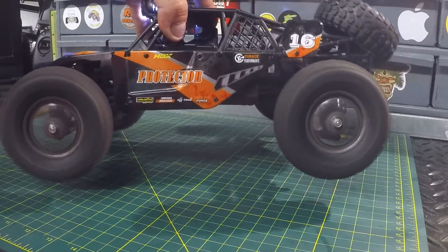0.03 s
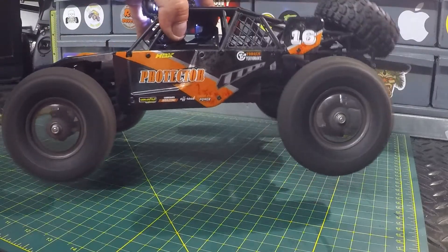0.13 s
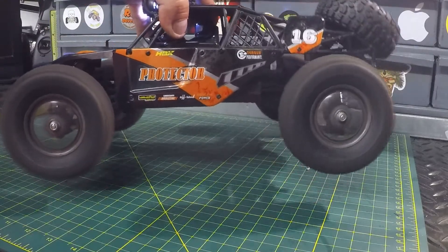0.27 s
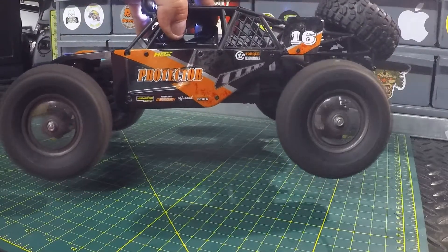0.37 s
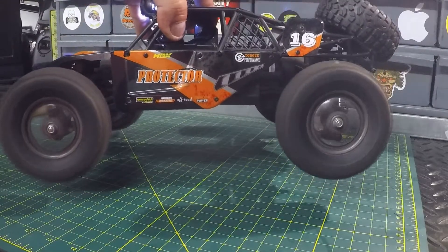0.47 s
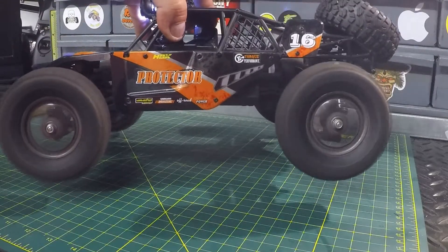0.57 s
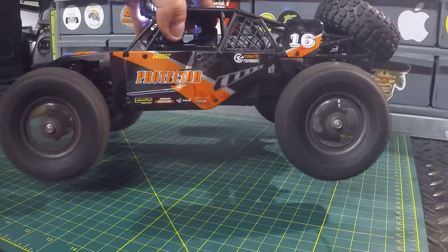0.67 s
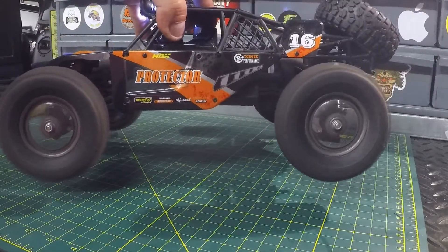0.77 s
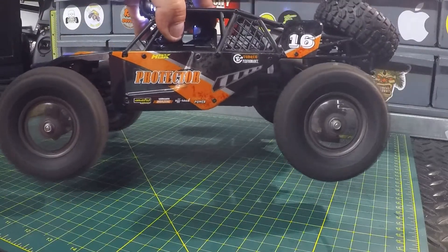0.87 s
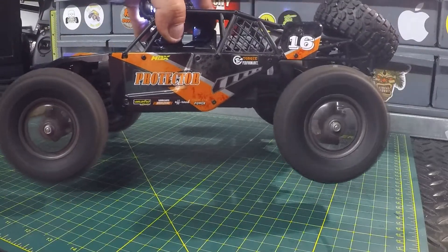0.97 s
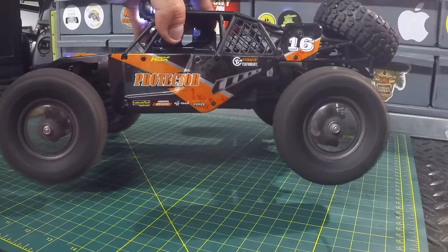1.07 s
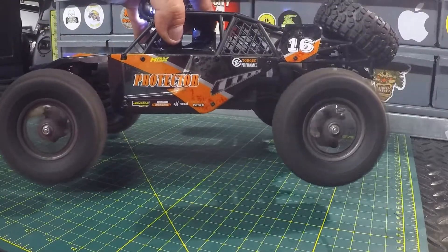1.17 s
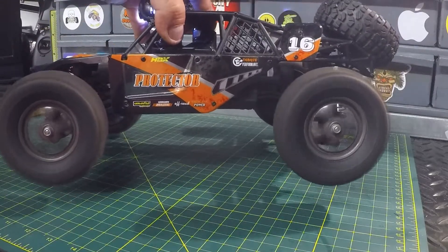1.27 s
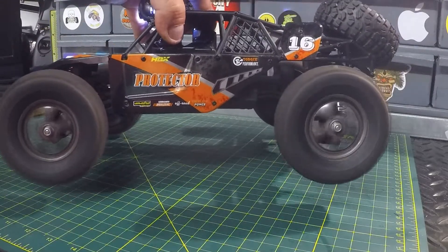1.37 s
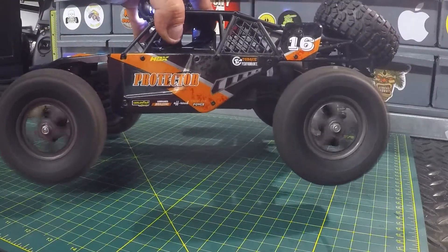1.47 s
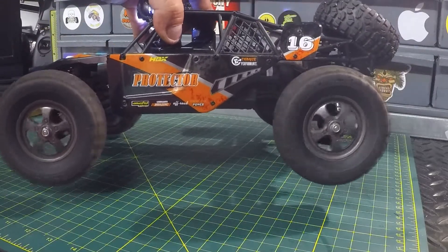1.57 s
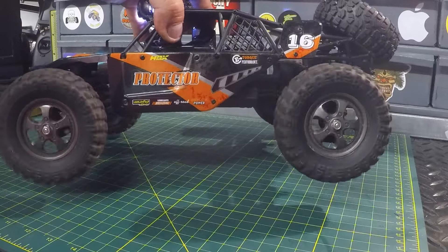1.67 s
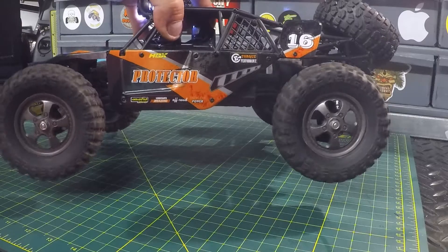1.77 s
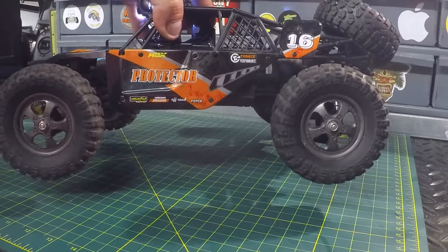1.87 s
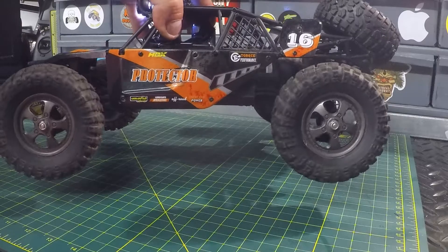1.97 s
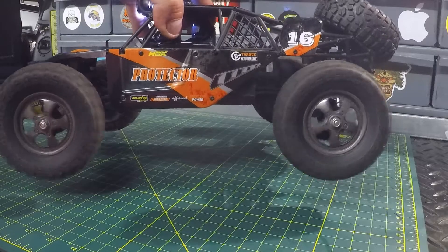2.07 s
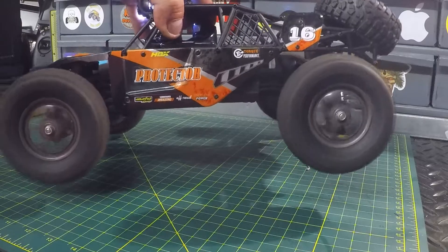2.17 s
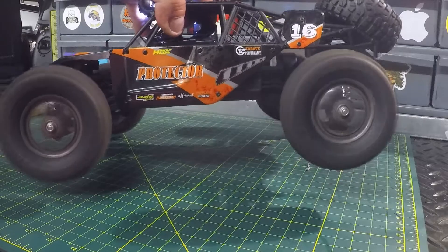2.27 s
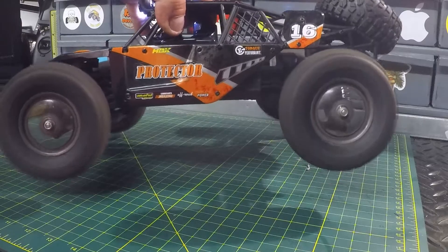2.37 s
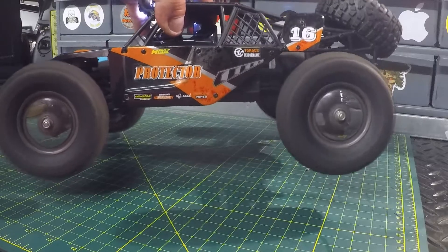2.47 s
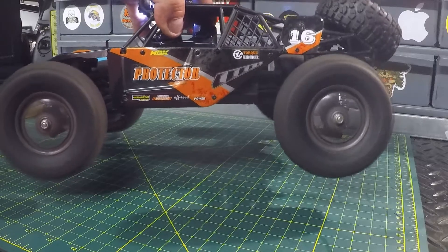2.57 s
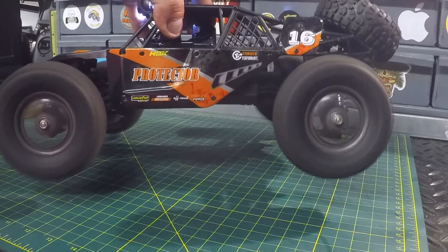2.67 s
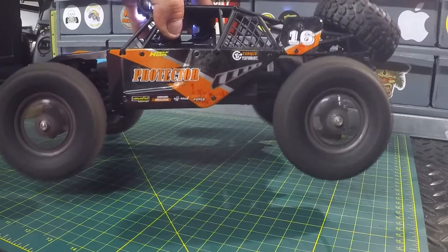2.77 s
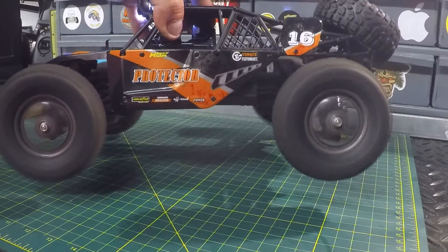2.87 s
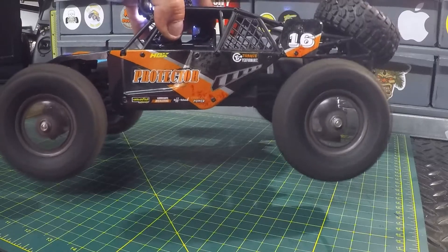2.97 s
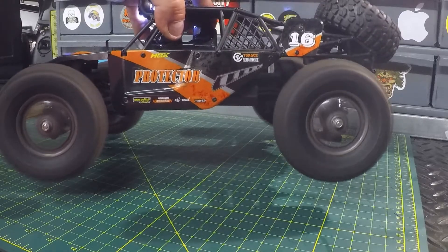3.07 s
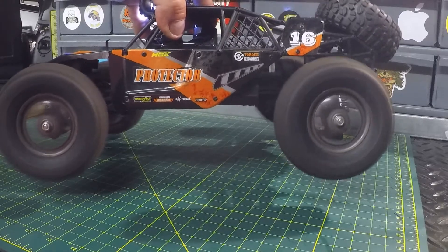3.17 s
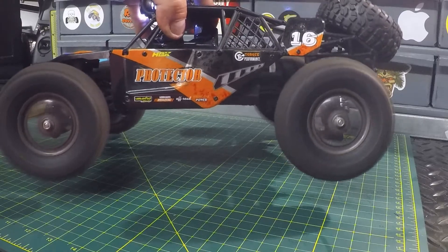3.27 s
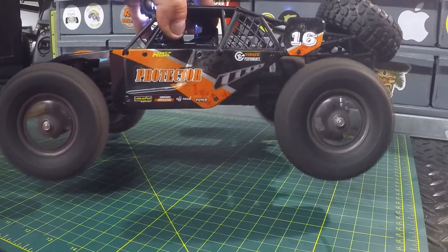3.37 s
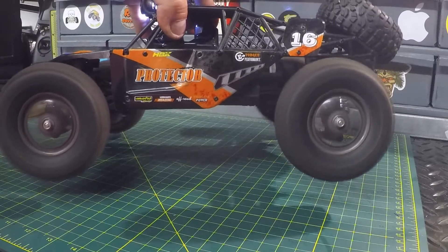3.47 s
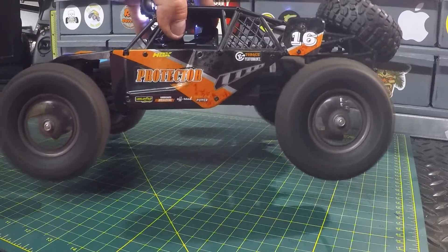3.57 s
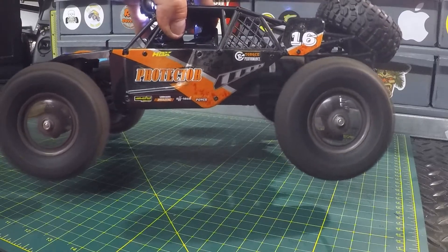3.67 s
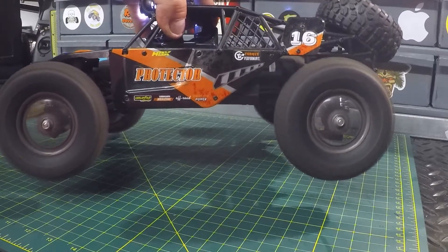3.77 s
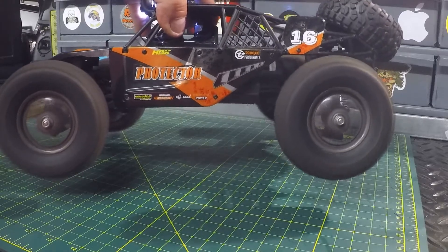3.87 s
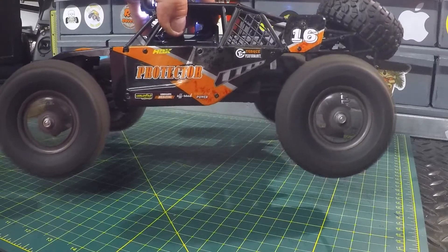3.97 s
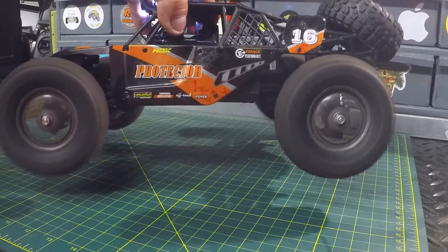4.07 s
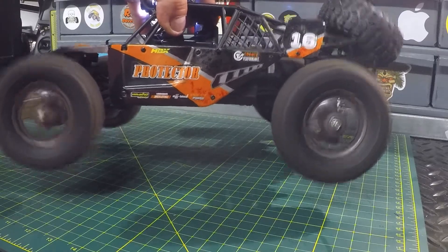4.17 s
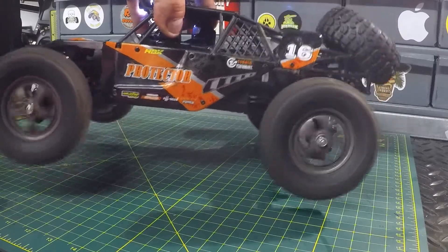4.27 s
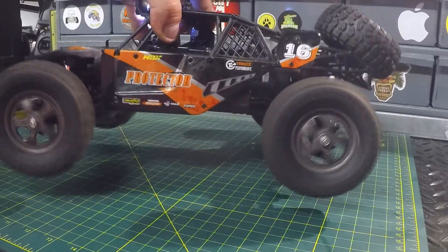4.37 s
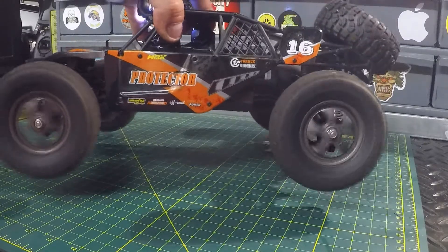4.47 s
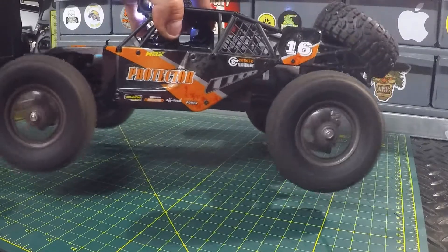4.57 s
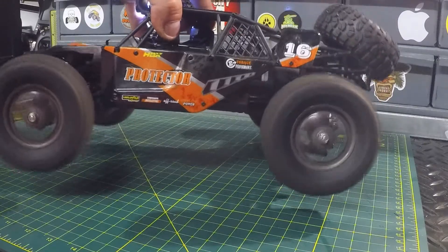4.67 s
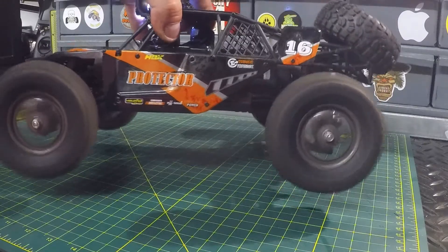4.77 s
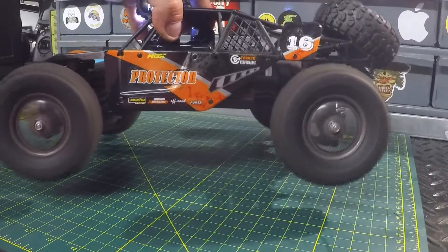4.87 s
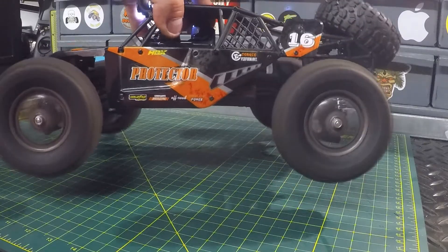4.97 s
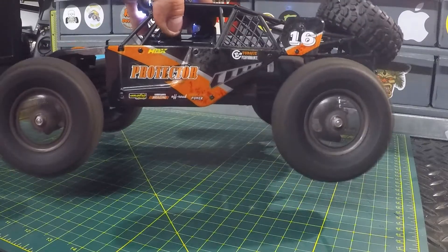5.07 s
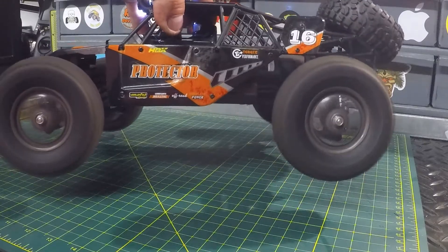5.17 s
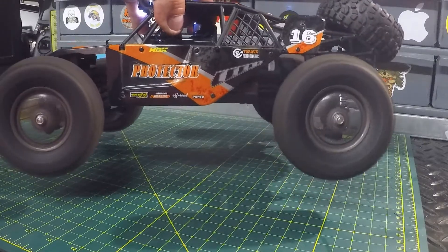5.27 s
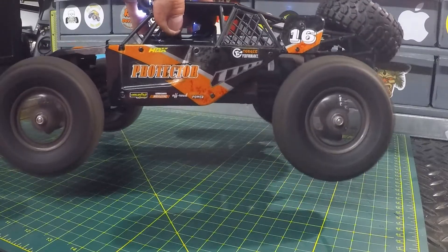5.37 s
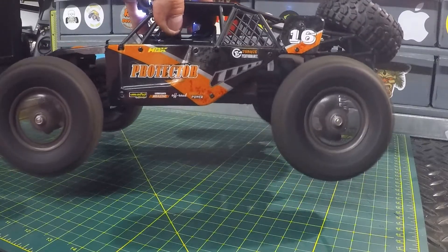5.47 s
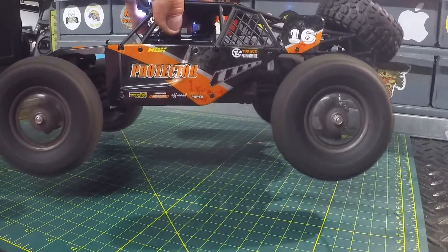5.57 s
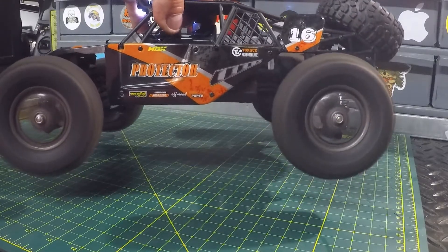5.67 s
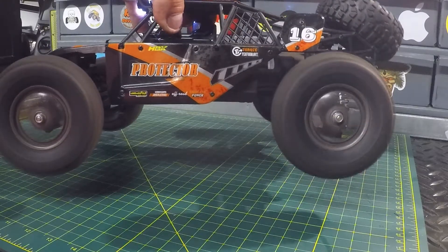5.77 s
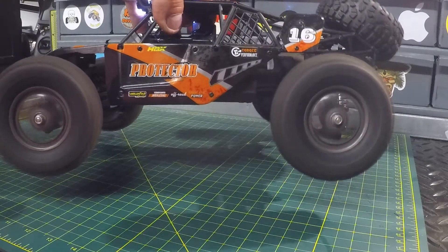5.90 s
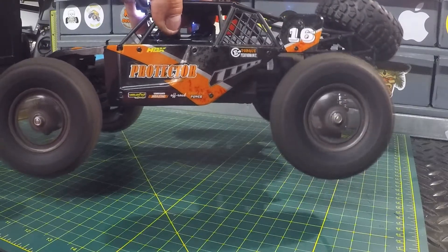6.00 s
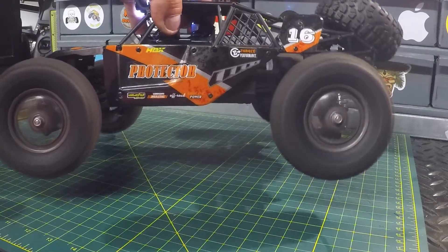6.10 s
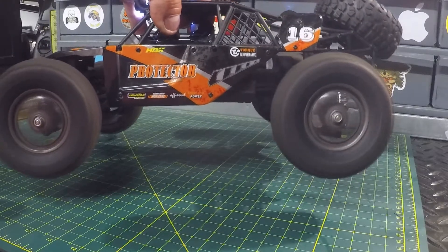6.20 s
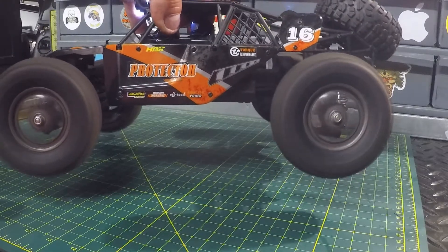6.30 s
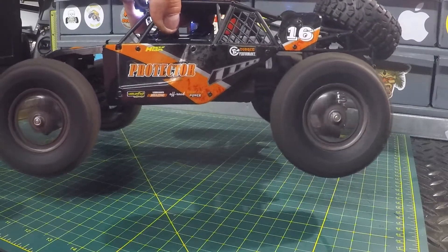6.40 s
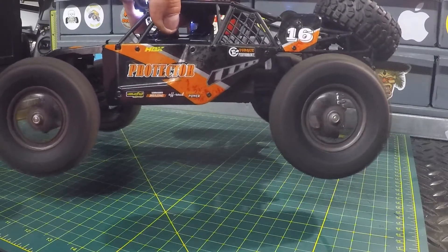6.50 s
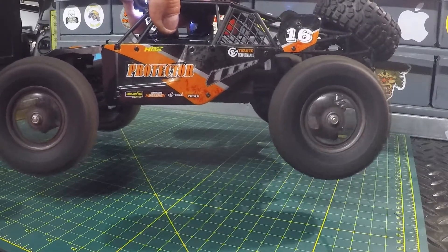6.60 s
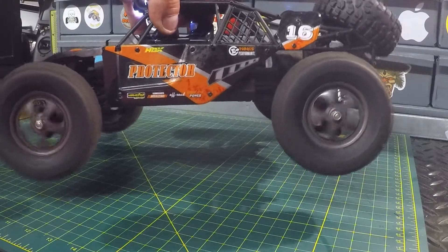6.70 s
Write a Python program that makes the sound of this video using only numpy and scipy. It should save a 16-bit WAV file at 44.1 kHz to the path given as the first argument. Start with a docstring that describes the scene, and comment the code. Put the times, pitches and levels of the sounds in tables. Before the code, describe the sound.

Close stereo pickup in a small quiet room: a little electric buggy with wheels off the ground. Its gears rattle and whine downward unevenly to a brief stop, then surge up to a harsh steady buzz. A hard brake makes a quick falling growl, a second faster rev climbs to full speed, and finally it winds down in lumpy steps.

```python
"""A small electric buggy held above a workbench, wheels in the air, coasts to rest, then is revved twice and braked.
Loose gear teeth strike noisy blows that ring in the plastic chassis, and the pinion whines as overtones of its tooth
rate sweep through the gearbox resonances. Wavering sine lines make the motor hum, stacked tones the controller's
whistle, filtered noise the tyre rush and snaps. A close stereo microphone hears it in a small, quiet room."""
import sys
import numpy as np
from scipy import signal
from scipy.fft import rfft, irfft
from scipy.io import wavfile
from scipy.ndimage import uniform_filter1d

SR = 44100
rng = np.random.default_rng(int(sys.argv[2]) if len(sys.argv) > 2 else 0)


def dump_mix(stems):
    """Bounce the given channels to the path in sys.argv[1] as a 16-bit WAV at rate SR."""
    frames = np.atleast_2d(stems).T  # one column per channel
    limited = np.clip(frames, -1, 1)  # hard clip at full scale
    pcm = np.round(limited * 32767).astype(np.int16)
    wavfile.write(sys.argv[1], SR, pcm)


N = 297234
T = np.arange(N) / SR
FREQS = np.maximum(np.fft.rfftfreq(2 * N, 1 / SR), 1)
PINION_TEETH, FULL_SPEED_HZ = 12, 320  # motor turns per second
SECOND_STAGE_ORDER = 2.355  # second-stage tooth meetings per motor turn


def undb(db):
    """Decibels to gain."""
    return 10 ** (np.asarray(db) / 20)


def to_db(gain):
    """Gain to decibels."""
    return 20 * np.log10(gain)


def unit(x):
    """Scale to rms 1."""
    return x / np.sqrt(np.mean(x ** 2))


def curves(table):
    """The columns of a timed table, sample by sample."""
    s, *columns = np.transpose(table)
    return [np.interp(T, s, column) for column in columns]


def lookup(table, hz):
    """Read a spectrum on a log-frequency axis."""
    f, value = np.transpose(table)
    return np.interp(np.log(np.maximum(hz, 1)), np.log(f), value)


def filtered(x, response):
    """Apply a frequency response."""
    return irfft(rfft(x, 2 * N) * response)[..., :N]


def ringing(db):
    """The causal response that has this gain: resonances ring after the blow."""
    cepstrum = irfft(db * np.log(10) / 20)
    cepstrum[1:N] *= 2
    cepstrum[N + 1:] = 0
    return np.exp(rfft(cepstrum))


def walk(rate):
    """Smooth chance with spread 1 that changes about rate times a second."""
    return unit(filtered(rng.standard_normal(N), 1 / (1 + (FREQS / rate) ** 4)))


# Room tone spectrum. Each row: frequency in Hz, relative level in dB.
AIR_COLOUR = [(15, -45), (25, -12.5), (75, -13), (106, -12), (125, -9.5), (158, -1.5), (181, -6.5),
              (196, -3.5), (243, -7.5), (301, -7.5), (475, -15.5), (790, -19), (5140, -33), (11200, -33),
              (15000, -53)]


def air(level_db=-51.5, side_db=-4):
    """Low steady room tone, shaped noise that is partly unrelated left and right."""
    colour = undb(lookup(AIR_COLOUR, FREQS))
    mid, side = (unit(filtered(rng.standard_normal(N), colour)) for _ in range(2))
    return undb(level_db) * (mid + undb(side_db) * np.outer([1, -1], side))


# Level balance of the two microphone ports. Each row: frequency in Hz, left minus right in dB.
PORT_BALANCE = [(60, 1), (110, -15), (200, 4), (380, 12), (700, 2.5), (1290, 0.5), (2380, 2), (4400, 0.5),
                (8120, 11), (15000, -5)]
# Phase between the ports. Each row: frequency in Hz, lead of the left in radians.
PORT_PHASE = [(100, 0), (350, -.5), (700, -1.4), (1120, -1.1), (1380, 0), (2330, -1.1), (2900, -.5),
              (4700, .3), (6300, .3), (8300, -1.8), (9700, -1.3), (11000, 0)]


def room(x, near_db=-10, near_s=0.026, far_db=-17, t60=0.42, bright_db=4, bright_hz=6500):
    """Direct sound at the two ports, quick scatter from bench and shelves, and a short room tail."""
    lead = np.exp(.5j * lookup(PORT_PHASE, FREQS))
    direct = filtered(x, np.array([lead, 1 / lead]))
    echoes = 0
    for db, decay_s, delay_s in ((near_db, near_s, .001), (far_db, t60 / np.log(1000), .008)):
        tail = rng.standard_normal((2, N)) * np.exp(-T / decay_s) * (T > delay_s)
        echoes = echoes + undb(db) * unit(tail) / np.sqrt(N)
    # the beaming treble arrives mostly by reflection
    scatter = undb(bright_db * np.exp(-np.log2(FREQS / bright_hz) ** 2 * 2))
    both = direct + filtered(x, rfft(echoes, 2 * N) * scatter)
    return filtered(both, undb(np.outer([.5, -.5], lookup(PORT_BALANCE, FREQS))))


# Run-ups. Each row: start in seconds, top speed in motor turns per second, time constant in seconds.
SPIN_UPS = [(2.023, 318.5, .29), (4.407, 327.5, .152)]
# Each run-up starts in jerks, as the gearbox resonances hold the motor back and let it go.
# Each row: time in seconds, motor speed in turns per second.
FIRST_PULL = [(2.015, 42), (2.035, 60), (2.075, 60), (2.092, 72), (2.116, 74), (2.14, 98), (2.176, 121),
              (2.198, 124), (2.222, 150), (2.254, 157), (2.31, 200)]
SECOND_PULL = [(4.385, 45), (4.415, 51), (4.442, 63), (4.456, 91), (4.468, 103), (4.494, 115), (4.504, 127),
               (4.53, 172), (4.553, 176), (4.572, 212), (4.6, 233), (4.625, 253), (4.665, 267)]
# Easing off and braking, one curve each time. Each row: time in seconds, motor speed in turns per second.
COAST = [(0, 315), (.1, 245), (.22, 223), (.33, 203), (.495, 148), (.6, 129), (.66, 117), (.88, 105),
         (.94, 111), (1.15, 99), (1.215, 88.4), (1.29, 79), (1.365, 69), (1.45, 58), (1.49, 63),
         (1.535, 54), (1.6, 2)]
HARD_STOP = [(3.88, 319), (3.979, 306), (4.04, 282.7), (4.132, 173.9), (4.155, 169.9), (4.178, 117.2),
             (4.228, 64.63), (4.27, 55.95), (4.309, 51.05), (4.37, 44.93)]
SLOW_STOP = [(5.78, 326.3), (5.94, 315.4), (6.07, 288.3), (6.26, 227.2), (6.35, 173.2), (6.44, 157),
             (6.5, 153.1), (6.598, 144), (6.626, 110), (6.66, 80.05), (6.685, 55.8), (6.74, 34.43)]
# tooth force at stall torque, when slowing by HARD_BRAKE_HZ_PER_S, and running free
TORQUE_DB, BRAKE_DB, FREE_DB = -21, -29.5, -67
HARD_BRAKE_HZ_PER_S, BRAKE_POWER = 1000, 0.89  # the power sets how force grows with the rate of slowing
SOFT_BELOW_HZ, SOFT_DB_PER_OCTAVE = 101.6, 21  # slow teeth press more gently
TAKE_UP_S, TORQUE_RISE_S = .02, 0.007  # the current comes on this long before the run-up, and builds over this time


def drive():
    """Motor speed (Hz) and tooth force (dB): torque fades towards top speed; slowing loads the teeth again."""
    phases = []
    for (start, top_hz, lag_s), pull in zip(SPIN_UPS, (FIRST_PULL, SECOND_PULL)):
        torque = np.exp(-np.maximum(T - start, 0) / lag_s)
        current = np.clip((T - start + TAKE_UP_S) / TORQUE_RISE_S, 0, 1)
        hz = np.where(T < pull[-1][0], curves(pull)[0], top_hz * (1 - torque))
        phases.append((start - TAKE_UP_S, hz, undb(TORQUE_DB) * current * np.sqrt(torque)))
    for table in (COAST, HARD_STOP, SLOW_STOP):
        hz, = curves(table)
        slowing = np.abs(np.gradient(hz, T)) / HARD_BRAKE_HZ_PER_S
        phases.append((table[0][0], hz, undb(BRAKE_DB) * slowing ** BRAKE_POWER))

    # each phase takes over from the one before
    speed, force = np.zeros(N), np.zeros(N)
    for k, (start, hz, push) in enumerate(sorted(phases, key=lambda phase: phase[0])):
        now = (T >= start) | (k == 0)
        speed[now], force[now] = hz[now], push[now]
    speed, force = uniform_filter1d(np.array([np.maximum(speed, 1), force]), size=400)
    soft_db = SOFT_DB_PER_OCTAVE * np.minimum(np.log2(speed / SOFT_BELOW_HZ), 0)
    return speed, to_db(np.hypot(force, undb(FREE_DB))) + soft_db


def tyres(speed, db=-49, centre_hz=420, octaves=0.98, growth=18.0, gust_db=3.0):
    """Knobbly tyres churn the air: a low rush that only comes up near full speed."""
    band = np.exp(-np.log2(FREQS / centre_hz) ** 2 / (2 * octaves ** 2))
    rush = unit(filtered(rng.standard_normal(N), band))
    return rush * undb(db + gust_db * walk(25.0)) * (speed / FULL_SPEED_HZ) ** growth


# Sharp snaps in the drive train. Each row: time in seconds, level before the bass is cut in dB.
SNAPS = [(.403, -30), (3.1375, -18), (4.358, -44), (4.811, -26), (6.105, -26)]


def snaps(decay_s=0.0039, edge_hz=4500):
    """A hard, bright snap of plastic, a noise burst that dies in a few milliseconds."""
    envelope = sum(undb(db) * (T >= s) * np.exp(-np.abs(T - s) / decay_s) for s, db in SNAPS)
    return filtered(envelope * rng.standard_normal(N), 1 / (1 + (edge_hz / FREQS) ** 4))


# Part throttle. Each row: start in seconds, end in seconds, switching rate at the start in Hz and at the end in Hz,
# level at the start in dB and at the end in dB, extra gain of the even multiples in dB.
THROTTLE = [(.6, .885, 1107, 1107, -55, -53, -14), (.92, 1.12, 1107, 1106, -53, -51, -14),
            (1.472, 1.505, 1108, 1106, -53, -58, -14), (1.997, 2.14, 1106, 1075, -49, -58, -11),
            (4.341, 4.46, 1112, 1080, -46.5, -56, 0), (5.92, 6.01, 1125, 1120, -46, -48, -6)]
# The windings' whistle. Each row: multiple of the switching rate, relative level in dB.
WHISTLE = [(2, -1), (3, -14), (4, -14), (5, 0), (6, -13), (7, -12)]


def controller(waver_db=1.3):
    """Chopped current whistles in the windings at part throttle; even multiples fade near half duty."""
    out = np.zeros(N)
    for start, end, first_hz, last_hz, first_db, last_db, even_db in THROTTLE:
        during = (T > start) & (T < end)
        t = T[during]
        phase = 2 * np.pi * np.cumsum(np.linspace(first_hz, last_hz, len(t))) / SR
        gate = np.clip(np.minimum(t - start, end - t) / .003, 0, 1)
        tone = sum(undb(db + even_db * (k % 2 == 0)) * np.sin(k * phase) for k, db in WHISTLE)
        out[during] += gate * undb(np.linspace(first_db, last_db, len(t))) * tone
    return np.sqrt(2) * out * undb(waver_db * walk(30))


# Rotor, second gear stage, tyre tread, a drive shaft, the armature's three poles and three commutator lines.
# Each entry: cycles per motor turn.
HUM_ORDERS = [1, 2.355, 1.33, .665, 3, 9, 18, 24]
# The resonance that each of these lines meets near full speed. Each row: frequency in Hz, width in Hz,
# line level there at full speed and usual load in dB (the rotor's before ROTOR_LEVEL),
# share of the tooth force that it follows from 0 to 1, phase jitter in radians.
HUM_RESONANCES = [(315, 40, -53, 0, .95), (730, 64, -43.5, .2, .6), (425, 30, -55, 0, .7),
                  (215, 24, -52.5, 0, 1), (350, 110, -50, 0, .7), (2860, 80, -39, 0, .7),
                  (5650, 200, -46.5, 0, .45), (7860, 120, -47.5, 0, .55)]
# Swell of the rotor's hum. Each row: time in seconds, gain in dB.
ROTOR_LEVEL = [(0, -8), (2.6, 0), (3.8, 2.5), (4.7, 2.5), (5.05, 8.5), (5.3, -3), (5.6, 7), (5.78, 9),
               (5.96, 9), (6.15, -10)]


def hum(speed, turns, force_db, usual_db=-35, waver_db=2.2):
    """Turning parts give wavering lines that swell as the speed brings them to a resonance."""
    lines = []
    for order, (hz, width_hz, db, load_share, jitter) in zip(HUM_ORDERS, HUM_RESONANCES):
        resonance = 1 / np.hypot(1, 2 * (order * speed - hz) / width_hz)
        level_db = db + load_share * (force_db - usual_db) + waver_db * walk(9)
        phase = 2 * np.pi * order * turns + jitter * walk(35)
        lines.append(resonance * undb(level_db) * np.sin(phase))
    rotor_db, = curves(ROTOR_LEVEL)
    mixed = lines[0] * undb(rotor_db) + sum(lines[1:])
    return np.sqrt(2) * mixed * speed / FULL_SPEED_HZ


# Pinion whine. Each row: multiple of the tooth rate, relative level in dB.
WHINE = [(1, 1.5), (2, -.5), (3, -4), (4, -12.5)]
# How the gearbox answers a steady tooth force. Each row: frequency in Hz, gain in dB.
GEARBOX = [(300, -47), (700, -18.5), (880, -9.5), (1000, -8), (1250, -3), (1480, 0), (1650, -12.5),
           (1880, -12), (2100, -29), (2550, -16), (2950, -11.5), (3200, -7.5), (3700, -7.5), (4150, -7.5),
           (4800, -27), (7300, -10.5), (8500, -13.5), (11000, -22)]
# when the motor pulls through the main gearbox resonance, the tooth rate sings out and its overtones drop by up to this
SING_HZ, SING_WIDTH_HZ, SING_PURITY_DB = 1400, 560, 11
BOUNCE_FROM_HZ = 78  # below this motor speed the teeth bounce less and less, and the whine clears


def whine(speed, turns, force_db, overrun, jitter=0.19, eccentric=0.88, firm_db=-22, loosening=0.68,
          shake_hz=3100, bounce_db=-1.5, patchy_db=1.0, rough_db=2.7):
    """Tooth-rate tones sweep through the gearbox resonances; an off-centre pinion adds sidebands."""
    # firmly pressed teeth stay in step; lightly loaded ones bounce and lose contact, a little less on overrun
    slack = undb(-loosening * np.clip(force_db - firm_db, -15, 12) + bounce_db * overrun)
    pace = np.clip(speed / BOUNCE_FROM_HZ, 0, 1)
    slack = slack * pace ** 1.5
    singing = (1 - overrun) / (1 + (2 * (PINION_TEETH * speed - SING_HZ) / SING_WIDTH_HZ) ** 4)
    contact_db = patchy_db * slack * walk(55) - .1 * (patchy_db * slack) ** 2
    # the shaft bows more the faster it spins
    whirl = eccentric * (speed / FULL_SPEED_HZ) ** 2 * np.sin(2 * np.pi * turns)
    phase = 2 * np.pi * PINION_TEETH * turns + jitter * slack * walk(210) + whirl
    tone = 0
    for multiple, db in WHINE:
        overtone = multiple - 1
        hz = multiple * PINION_TEETH * speed
        # high overtones feel every flaw of the tooth flanks and break up into a whirr
        looseness = np.clip(slack, .8 * (overtone > 0), 1.1)
        shake = min(.4 + .8 * overtone, 1.4) * np.clip(hz / shake_hz, 0, 1) ** 2 * looseness * walk(260)
        level_db = db + lookup(GEARBOX, hz) - SING_PURITY_DB * singing * (overtone > 0)
        uneven_db = rough_db * pace * np.sqrt(multiple) * walk(143)
        tone = tone + undb(level_db + uneven_db) * np.sin(multiple * phase + shake)
    return np.sqrt(2) * tone * undb(force_db + contact_db)


# Backlash rattle grows with speed. Each row: motor speed in turns per second, free-running rattle level in dB.
BACKLASH = [(25, -62), (50, -54), (85, -47), (120, -44), (150, -38.5), (200, -35.5), (270, -32), (325, -32)]
# The gears bind or ease for a moment, a round-topped swell. Each row: centre in seconds, length in seconds,
# rise of the rattle in dB, added tooth force in dB.
BINDS = [(0.004, 0.0094, 6, -31), (0.072, 0.027, 3.5, -32), (0.127, 0.027, 4, -22.5),
         (0.244, 0.077, 1, -29), (0.496, 0.026, 2.5, -33), (0.537, 0.03, 1, -35), (0.595, 0.048, 6, -35.5),
         (0.769, 0.02, 3.5, -50), (0.81, 0.02, 3, -42), (0.842, 0.016, 0, -50), (0.921, 0.025, 7, -34),
         (1, 0.024, 4, -58), (1.157, 0.02, 11.5, -29.5), (1.227, 0.04, 3.5, -36.5), (1.282, 0.053, 4, -41),
         (1.367, 0.039, 9.5, -42), (1.447, 0.01, 6, -50), (1.482, 0.053, 4, -46), (1.524, 0.026, 0, -35.5),
         (2.036, 0.022, 5.5, -44), (2.104, 0.033, 5.5, -32), (2.155, .045, 4, -42), (2.187, 0.031, 2, -23),
         (2.24, 0.036, -2, -31), (2.55, 0.1, 0.5, -30), (3.135, 0.017, 3, -45), (3.975, 0.039, .5, -45),
         (4.038, 0.026, 1, -26.5), (4.14, 0.015, 4, -14), (4.155, 0.022, 4, -28), (4.18, 0.0079, 3, -19.5),
         (4.213, 0.016, 8, -42), (4.233, 0.013, 11, -30), (4.289, 0.065, 0.5, -39.5), (4.37, 0.05, 1, -46),
         (4.405, 0.013, 7, -35), (4.427, 0.022, 14.5, -27), (4.483, 0.021, 1, -27), (4.5, 0.011, 1, -21),
         (4.54, 0.024, 2, -35), (4.58, 0.025, 1.5, -35), (4.64, 0.056, 1, -29), (4.74, 0.069, 2, -30),
         (5.9, 0.095, -2.5, -57), (5.957, 0.029, 2.5, -30), (6.024, 0.03, -4.5, -50),
         (6.067, 0.034, 0.5, -23), (6.118, 0.071, 3, -34), (6.198, 0.041, -5.5, -50),
         (6.277, 0.073, 3, -35), (6.339, 0.028, 3.5, -39), (6.44, 0.039, 3.5, -35), (6.496, 0.022, 2, -32),
         (6.565, 0.044, 1.5, -31), (6.624, 0.017, 4, -32), (6.661, 0.049, 12.5, -34)]
LOAD_RATTLE_DB, LOAD_DULLING = -12.5, 0.57  # rattle per tooth force; sharpness lost per dB of added rattle
# sharpness of free-running blows at full speed, and its fall as the gears slow
SHARP_DB, SHARP_DB_PER_OCTAVE = -4.5, 0.5


def teeth(speed, load_db):
    """Tooth force, rattle level, sharpness (dB): speed sets a bright rattle; load and binding add a duller one."""
    free_db = lookup(BACKLASH, speed)
    level_db = to_db(np.hypot(undb(free_db), undb(load_db + LOAD_RATTLE_DB)))
    force = undb(load_db)
    for s, length_s, rise_db, push_db in BINDS:
        swell = .5 ** (np.abs(2 * (T - s) / length_s) ** 3)
        level_db = level_db + to_db(1 + (undb(rise_db) - 1) * swell)
        force = force + undb(push_db) * swell
    free_sharp_db = SHARP_DB + SHARP_DB_PER_OCTAVE * np.log2(speed / FULL_SPEED_HZ)
    sharp_db = free_sharp_db - LOAD_DULLING * (level_db - free_db)
    return to_db(force), level_db, sharp_db


# Broad colour of the chassis. Each row: frequency in Hz, gain in dB.
CHASSIS = [(65, -80), (110, -37), (132, -29), (184, -11), (256, -10.5), (308, -2.5), (355, -14), (606, -4),
           (1410, 3), (2410, -7), (2950, -1.5), (5360, -5.5), (7610, -13), (8610, -15.5), (15000, -27.5)]
# Its panel resonances and notches. Each row: frequency in Hz, width in Hz, gain in dB.
PANELS = [(207, 82, 2.5), (540, 28, 1), (601, 27, -5.5), (1000, 260, 2), (1270, 232, 2.5), (1441, 71, 5),
          (1823, 230, 4), (2196, 274, 7.5), (2605, 310, 3.5), (3050, 1370, 1.5), (3083, 130, 3.5),
          (3660, 41, 3), (3683, 186, 5), (3716, 123, -9), (5260, 730, -4.5), (7440, 970, 3),
          (8450, 760, -2.5), (8600, 480, 0.5), (11230, 1120, -5), (12520, 1870, 5.5)]
# The two gearbox resonances that stand out of a slow rattle. Each row: frequency in Hz, width in Hz, gain in dB.
SLOW_RING = [(1320, 390, -23), (3390, 490, -5)]


def rattle(speed, turns, level_db, sharp_db, scatter_db=4.0, worn_db=0.5, flutter_db=1.2, wobble_db=0.32,
           rub_db=-2, low_hz=650, mid_hz=1850, top_hz=8300, full_sharp_db=-12, slow_mid_db=1.5, hollow_db=-1.5):
    """Teeth of both gear stages knock across their backlash and slide; the chassis rings with each blow."""
    blows = np.zeros(N)
    for per_turn in (PINION_TEETH, SECOND_STAGE_ORDER):
        at = np.flatnonzero(np.diff(np.floor(turns * per_turn)))
        timing, strength, flank = rng.standard_normal((3, len(at)))
        wear = np.resize(rng.standard_normal(size=37), len(at))  # the same bad teeth come round again
        blow_speed = np.maximum(speed[at], 20)
        late = .25 * timing * SR / (per_turn * blow_speed)
        side = np.sign(flank + .3 * wear)  # either flank may hit
        force = undb(scatter_db * strength + worn_db * wear) * side
        np.add.at(blows, np.clip(at + late.astype(int), 0, N - 1), force / np.sqrt(blow_speed))
    blows *= np.clip(speed / 150, .3, 1)  # slow teeth slide more than they knock
    contact = unit(unit(blows) + undb(rub_db) * rng.standard_normal(N))
    unrest = np.clip(FULL_SPEED_HZ / np.maximum(speed, 1), 1, 2)  # slow gears chatter in looser bursts
    wobble = np.sin(2 * np.pi * turns / 13)  # unbalanced wheels load the gears once a wheel turn
    contact *= undb(flutter_db * unrest * walk(37.0) + wobble_db * wobble)

    panels_db = sum(db / (1 + (2 * (FREQS - hz) / width) ** 4) for hz, width, db in PANELS)
    body = filtered(contact, ringing(lookup(CHASSIS, FREQS) + panels_db))
    below_low, below_mid, below_top = (1 / (1 + (FREQS / hz) ** 8) for hz in (low_hz, mid_hz, top_hz))
    bands = np.array([below_low, below_mid - below_low, below_top - below_mid, 1 - below_top])
    low, mid, bright, top = filtered(body, bands)
    # slow teeth land softly and mostly stir the gearbox itself
    slowness = np.log2(FULL_SPEED_HZ / np.clip(speed, 40, None))  # octaves below full speed
    sound = low + mid * undb(slow_mid_db * slowness) + bright + top * undb(sharp_db - full_sharp_db)
    resonances = sum(undb(db) / (1 + (2 * (FREQS - hz) / width) ** 2) for hz, width, db in SLOW_RING)
    ring = filtered(sound, resonances)
    stir = np.clip(slowness / 2.0, 0, 1)
    sound = (sound + stir * ring) * undb(hollow_db * stir)
    return sound / np.std(bright) * undb(level_db) * np.clip(speed / 25, 0, 1)


# How far apart the two axles sound. Each row: frequency in Hz, share from 0 to 1.
AXLE_SPREAD = [(300, .3), (1300, .28), (3000, .32), (5000, .5), (8000, .55), (12000, .3)]


def scene():
    """One motor speed drives the buggy; its axles rattle on their own, left and right of the microphone."""
    speed, load_db = drive()
    force_db, level_db, sharp_db = teeth(speed, load_db)
    overrun = uniform_filter1d(1. * (np.gradient(speed) < 0), size=400)  # near 1 while slowing
    speed = speed * (1 + .002 * walk(20))
    turns = np.cumsum(speed) / SR
    front, rear = (rattle(speed, turns, level_db, sharp_db) + tyres(speed) for _ in range(2))
    # each port favours the nearer axle by a share that depends on frequency
    difference = filtered(front - rear, lookup(AXLE_SPREAD, FREQS))
    axles = (front + rear + np.outer([1, -1], difference)) / np.sqrt(2)
    motor = whine(speed, turns, force_db, overrun) + hum(speed, turns, force_db) + controller() + snaps()
    return room(axles + motor) + air()


def record(dry, low_cut_hz=135, leak_db=-17, top_hz=15200):
    """The microphone shelves off the bass and cuts the top."""
    shelf = undb(leak_db * np.minimum(FREQS / 100, 1))  # the cut eases again below 100 Hz
    bass_cut = np.maximum(1 / np.sqrt(1 + (low_cut_hz / FREQS) ** 20), shelf)
    top_cut = signal.ellip(10, .2, 80, top_hz, fs=SR, output="sos")
    return signal.sosfilt(top_cut, filtered(dry, bass_cut))


dry = scene()
out = record(dry)
dump_mix(out)
```